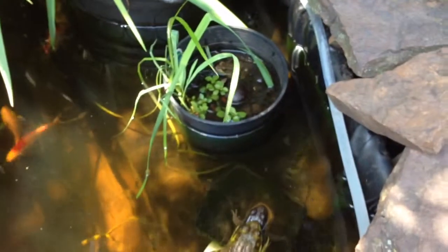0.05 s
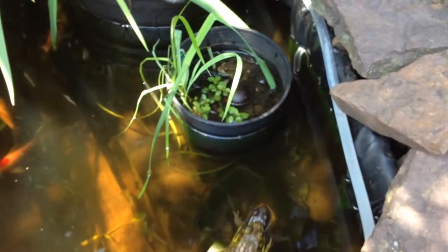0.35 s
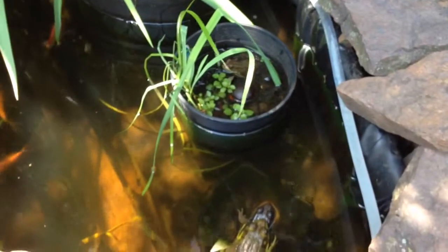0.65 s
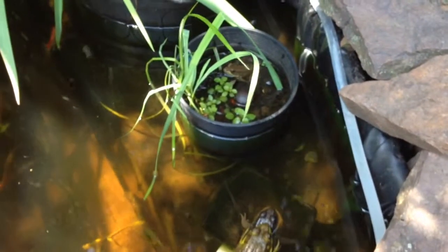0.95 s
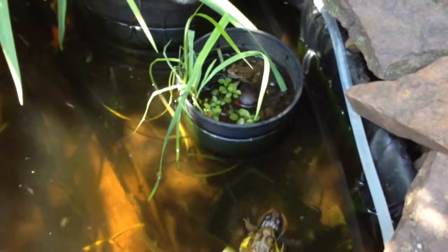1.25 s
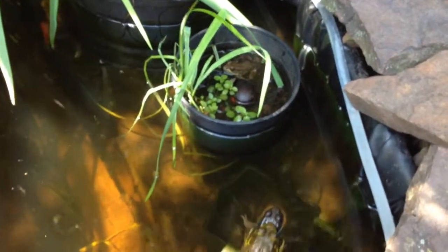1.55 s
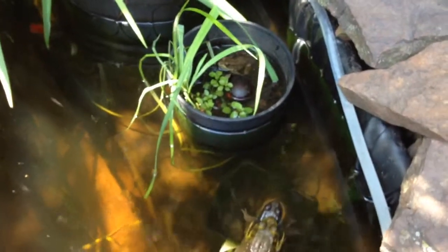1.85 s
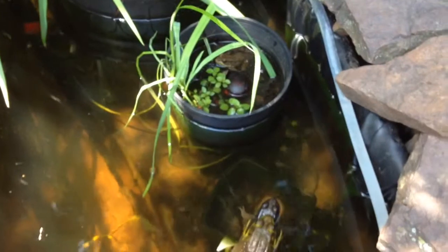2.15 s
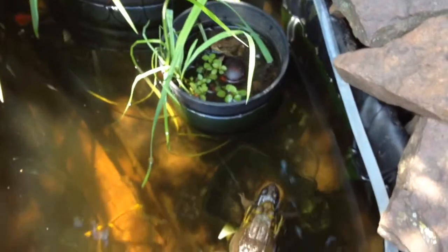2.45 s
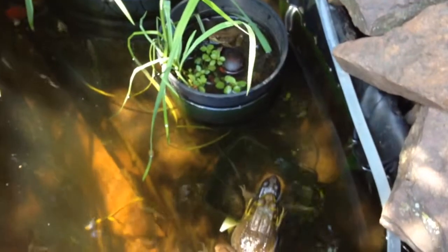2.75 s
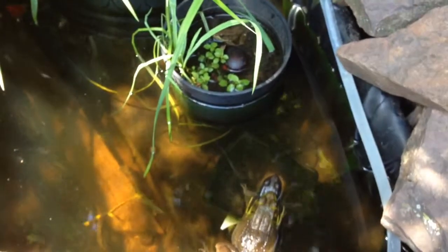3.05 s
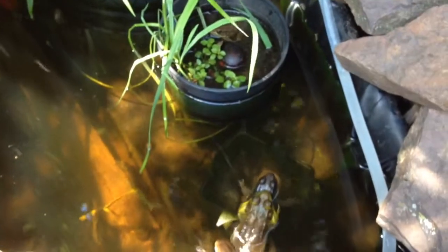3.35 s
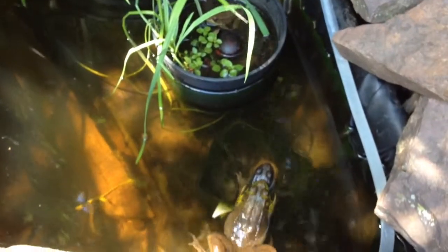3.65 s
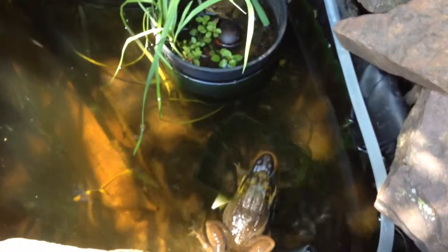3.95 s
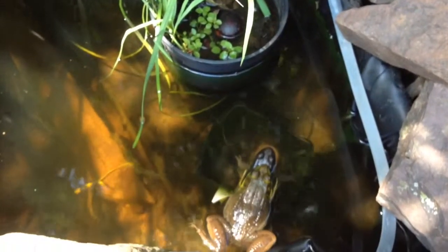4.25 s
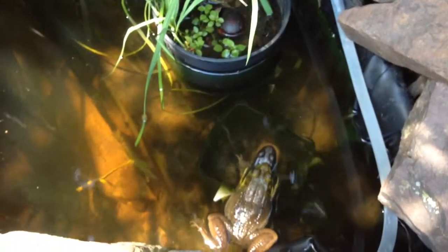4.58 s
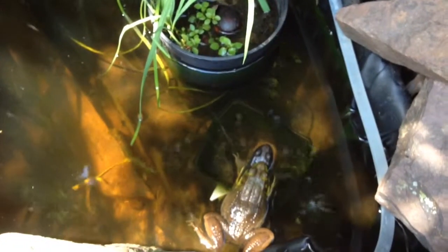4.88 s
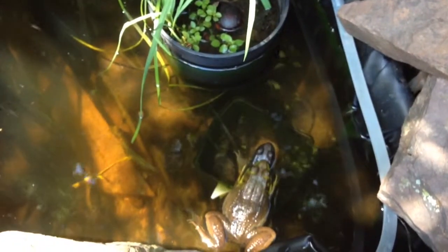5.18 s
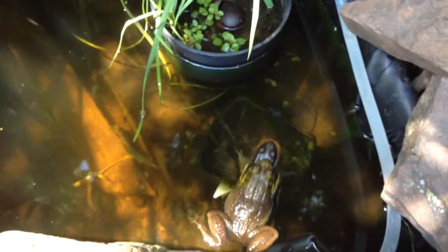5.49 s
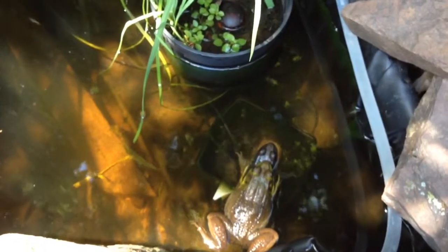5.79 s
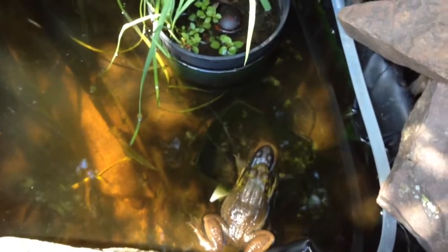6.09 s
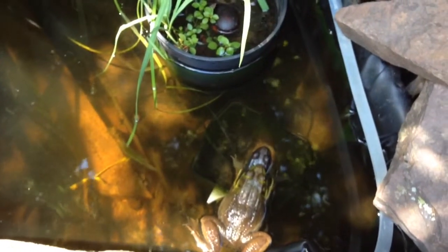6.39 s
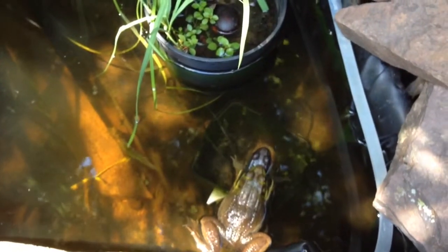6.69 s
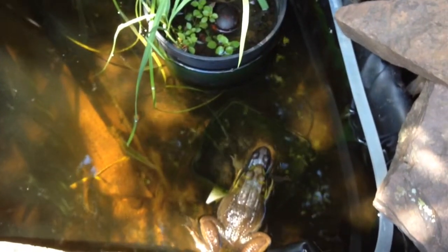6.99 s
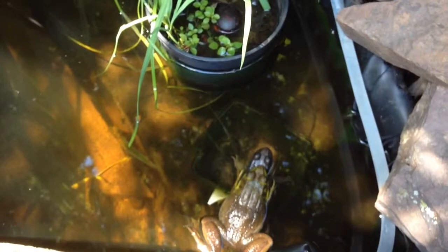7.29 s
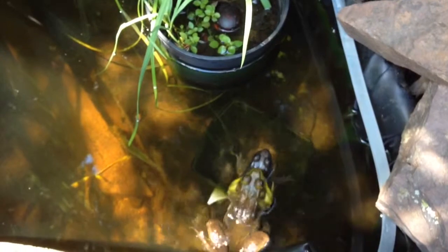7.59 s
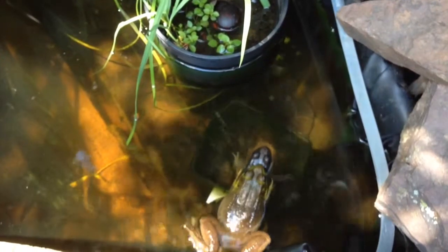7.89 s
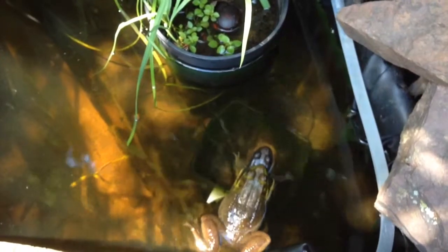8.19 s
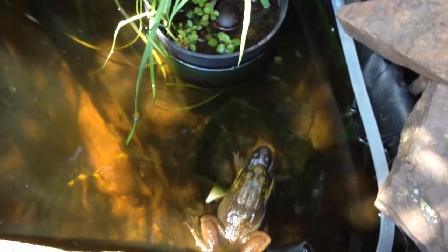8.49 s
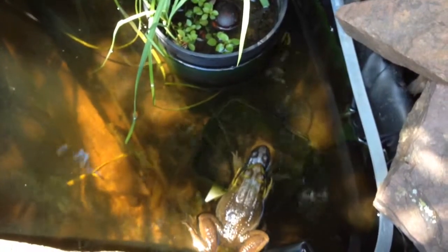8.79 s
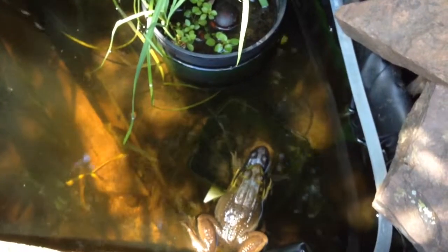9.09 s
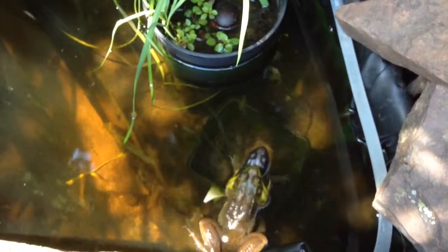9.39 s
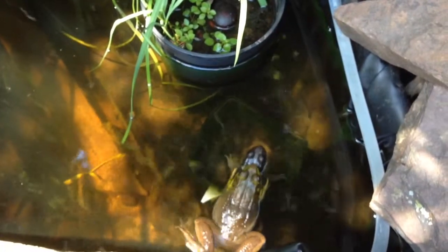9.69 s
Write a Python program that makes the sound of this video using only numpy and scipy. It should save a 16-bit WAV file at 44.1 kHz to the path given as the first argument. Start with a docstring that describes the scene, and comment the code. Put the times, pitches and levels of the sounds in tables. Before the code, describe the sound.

A frog gives five short, twanging croaks close by, over softly trickling pond water and a low pump hum.

```python
"""Green frog in a garden pond

A frog gives five twanging croaks, close by, in a small lined pond. Each opens with a fast flutter
of the voice box, then slows and dulls as the vocal sac (its throat pouch) rings on.
Water trickles in with small ringing bubbles and splash ticks. Behind it a pump hums with a slow
throb, and the garden air hisses and rumbles softly."""
import sys
import numpy as np
from scipy import signal
from scipy.fft import rfft, irfft, next_fast_len
from scipy.io import wavfile
from scipy.ndimage import map_coordinates

SR = 44100
rng = np.random.default_rng(int(sys.argv[2]) if len(sys.argv) > 2 else 0)


def wav_record(signal):
    """Record a signal, one row per channel, as 16-bit PCM in the file named by sys.argv[1]."""
    frames = np.transpose(np.atleast_2d(signal))
    bounded = np.clip(frames, -1, 1)
    # unit amplitude maps onto the largest positive 16-bit level
    quanta = np.round(bounded * 32767).astype(np.int16)
    wavfile.write(sys.argv[1], SR, quanta)


N = 438354

# tone colour of the garden air and of its low rumble (frequency [Hz], relative level [dB])
AIR_COLOUR = [(22, -22.5), (60, -10), (115, -1), (160, -3.5), (225, -1), (270, -8), (350, -6), (430, -16),
              (750, -19.5), (1500, -23.5), (4000, -24), (15000, -32)]
RUMBLE_COLOUR = [(20, -17.5), (45, -5), (62, 2.5), (82, 2), (130, -12), (300, -39), (600, -81)]
# how the pump's main hum swells and fades (time [s], level [dB])
PUMP_SWELL = [(0, -51.5), (0.4, -52.5), (1.15, -54), (1.85, -47), (2.9, -58.5), (3.5, -51), (3.9, -55.5),
              (4.7, -56), (5.05, -49), (5.4, -61.5), (6.55, -61), (7.05, -50.5), (7.35, -60.5),
              (7.65, -53.0), (8.0, -62.5), (8.95, -67.5), (9.3, -55.5), (9.9, -51.5)]
# the pump's faint higher tones (frequency [Hz], level [dB])
PUMP_TONES = [(236.9, -69.5), (360, -78.5), (592.8, -82.5), (600.2, -83), (1541, -89)]
# how long the pond's echo lasts (frequency [Hz], time to fade by 60 dB [s])
ECHO_FADE = [(300, 0.39), (1500, 0.1), (5000, 0.019), (12000, 0.013)]
# how strongly the water runs in (time [s], relative strength [dB])
INFLOW = [(0, -65.5), (1.2, -65.5), (2.3, -63.5), (3.1, -66.5), (4.3, -64.5), (6.1, -66), (7.1, -64),
          (8.3, -65.5), (9.9, -65.5)]
# the clearest bubbles (time [s], level [dB], pitch [Hz])
PLINKS = [(0.295, -44, 1194), (0.54, -51.5, 926), (0.699, -45, 3500), (0.875, -48, 1900),
          (1.434, -49, 3560), (1.711, -44.5, 1166), (1.803, -49.5, 1880), (2.185, -52.5, 1285),
          (2.294, -44.5, 3500), (2.322, -42, 1150), (2.543, -49.5, 3080), (2.602, -49, 2300),
          (2.631, -49, 2720), (2.844, -48.5, 1780), (3.3, -44.5, 1256), (3.637, -49.5, 1200),
          (3.739, -47, 2690), (4.663, -44, 1890), (4.716, -45, 3610), (6.166, -51.5, 934),
          (6.284, -52, 910), (6.526, -34, 1790), (6.981, -46.5, 2170), (7.085, -49, 1157),
          (7.38, -45.5, 1780), (8.083, -47.5, 2280), (8.623, -47.5, 1056), (8.813, -47.5, 3330),
          (8.872, -42, 2560), (9.153, -47, 1227), (9.742, -51, 1930)]
# the clearest drops hitting the water (time [s], level [dB], pitch of the bubble left behind [Hz])
DROPS = [(0.4599, -46, 5640), (0.7801, -38.5, 4510), (1.1418, -44, 6200), (1.6387, -46, 6560),
         (1.9849, -39.5, 7700), (2.0931, -42.5, 4540), (2.2483, -43, 10900), (2.385, -42.5, 8700),
         (3.8696, -40, 7040), (3.9175, -40, 8600), (4.1989, -39.5, 5500), (4.7142, -46.5, 5570),
         (5.4685, -33, 9100), (6.8658, -44.5, 6590), (6.9147, -34.5, 5760), (7.014, -40.5, 7560),
         (7.7608, -42, 9280), (8.8712, -42, 9900)]
# tone colour of a splash and of the frog's spit (frequency [Hz], relative level [dB])
SPLASH_COLOUR = [(700, -8.5), (2000, -4), (4000, 2), (8000, 3), (11000, -2), (15500, 0)]
SPIT_COLOUR = [(3000, -20.5), (7000, -11), (8300, 0.5), (11000, -4), (12500, -15), (15500, -12.5)]
# when spit flies as the sac swells (position in the flutter [0 to 1])
SPIT_MOMENTS = [0.45, 0.8]
# how the head and eardrums send out the call (frequency [Hz], gain [dB])
HEAD_COLOUR = [(100, -27.5), (160, -24), (220, 1), (400, -0.5), (600, -4), (850, -3.5), (1060, -8.5),
               (1330, -5.5), (1800, -10), (2100, -10), (3000, -14.5), (3900, -24), (4700, -24.5),
               (7000, -41)]
# ringing hollows in the head (frequency [Hz], width [Hz], boost [dB])
HEAD_HOLLOWS = [(605, 90, 6), (1340, 170, 7), (1780, 190, 8), (2480, 200, 6), (2830, 200, 5),
                (4600, 500, 4)]
# slack vocal cords close softly and lose the high notes first (frequency [Hz], cut [dB per dB of edge])
SLACK_CUT = [(480, 0), (700, .15), (880, .3), (1050, .9), (1350, 1.1), (1700, 1.7), (3000, 2.2),
             (4500, 3)]
# pressed cords push the middle range forward (frequency [Hz], lift [dB per dB of edge])
PRESSED_LIFT = [(350, 0), (620, .7), (1050, .45), (1700, 1.05), (3500, 0)]
# a sharper snap lifts only the upper treble (frequency [Hz], lift [dB per dB of bite])
BITE_LIFT = [(2000, 0), (3100, 1)]
# flutters that open a croak or push it again; "edge" is brightness, "bite" is upper treble
# (first pulse [s], last pulse [s], level [dB], edge [dB], bite [dB], sac note [Hz], spit level [dB])
FLUTTERS = [(1.1810, 1.1898, -13.5, 4, 3, 446, -41.5), (3.3526, 3.3624, -13.5, 3, -0.5, 414, -36.5),
            (5.114, 5.1282, -19.5, 7, -2.5, 394, -53.5), (5.1448, 5.16, -22, 8, 1.5, 640, -55.5),
            (7.4948, 7.5, -11, 5, 4, 443, -41.5), (7.515, 7.53, -17, -0.5, 1.5, 387, -39),
            (9.324, 9.3377, -14.5, 0, -1, 395, -38)]
# croaks: the voice catches, pushes hard, then goes slack
# (start [s], length [s], catch length [s], end of push [s after start], bite [dB],
#  pushed level [dB], slack level [dB], pushed pulse rate [Hz], slack pulse rate [Hz],
#  pushed edge [dB], slack edge [dB], pushed sac note [Hz], slack sac note [Hz])
CROAKS = [(1.198, 0.18, 0.00016, 0.026, -5.5, -18.5, -24.5, 140.1, 119.6, -2, -9.5, 300, 332),
          (3.371, 0.2, 0.0034, 0.036, -2, -16, -22.5, 149.3, 120.9, -1, -10, 330, 332),
          (5.134, 0.25, 0.024, 0.070, -7, -22, -28, 150.4, 119.2, 1, -9, 286, 254),
          (7.5078, 0.186, 0.0225, 0.061, -1, -14.5, -22.5, 154, 118.7, -1, -10, 339.5, 342),
          (9.343, 0.2, 0, 0.026, -3, -18, -27, 143.4, 115.2, -2.5, -9.5, 316, 332)]


def amp(db):
    """Turn decibels into a gain."""
    return 10 ** (np.asarray(db) / 20)


def along(points, hz):
    """Read a (frequency, value) table at hz, on a log frequency scale."""
    freqs, values = np.transpose(points)
    return np.interp(np.log(hz + 1), np.log(freqs), values)


def curve(rows):
    """Turn a (time, value) table into one value per sample."""
    return np.interp(np.arange(N) / SR, *np.transpose(rows))


def wobble(rate):
    """A smooth curve through `rate` random points a second."""
    return map_coordinates(rng.standard_normal(int(N * rate / SR) + 4), [np.arange(N) * rate / SR])


def filtered(x, response):
    """Scale each frequency in x by response(frequency)."""
    size = next_fast_len(N + SR // 2)
    return irfft(rfft(x, size) * response(np.fft.rfftfreq(size, 1 / SR)), size)[:N]


def unit(x):
    """Scale x to an average (rms) level of 1."""
    return x / np.sqrt(np.mean(x ** 2) + 1e-20)


def noise(colour):
    """Noise of level 1 with the given tone colour."""
    return unit(filtered(rng.standard_normal(N), lambda hz: amp(along(colour, hz))))


def add(track, s, sound):
    """Mix a sound into the track at s seconds."""
    part = track[max(round(s * SR), 0):][:len(sound)]
    part += sound[:len(part)]


def ringing(gain):
    """A click with this gain at each frequency, which starts at once and rings afterwards."""
    cepstrum = irfft(np.log(np.maximum(gain, 1e-6)))
    half = len(cepstrum) // 2
    cepstrum[1:half] *= 2
    cepstrum[half + 1:] = 0
    return irfft(np.exp(rfft(cepstrum)))


def air(hiss_db=-59, rumble_db=-59):
    """A smooth outdoor hiss and an uneven low rumble."""
    swells = amp(2.8 * wobble(11))
    hiss = amp(hiss_db + .5 * wobble(3)) * noise(AIR_COLOUR)
    return hiss + amp(rumble_db) * unit(swells * noise(RUMBLE_COLOUR))


def pump(hum_hz=96.9, upper_hz=110.6, upper_db=-60):
    """Two close low tones beat against each other and throb, under faint higher tones."""
    t = np.arange(N) / SR
    tone = lambda hz: np.sqrt(2) * np.sin(2 * np.pi * hz * t + .3 * wobble(2))
    faint_tones = sum(amp(db + 2 * wobble(2)) * tone(hz) for hz, db in PUMP_TONES)
    swell_db = curve(PUMP_SWELL)
    drift_db, shudder_db = 1.8 * wobble(3), 1.8 * wobble(16)
    # the upper tone follows most of the hum's swell
    upper = amp(upper_db + .79 * (swell_db - swell_db.mean()) + drift_db) * tone(upper_hz)
    hum = amp(swell_db + .5 + shudder_db) * tone(hum_hz)
    return hum + upper + faint_tones


def pond_echo(x, low_cut_hz=700):
    """The liner and stones scatter the higher sounds into a brief echo."""
    hz, t, spectrum = signal.stft(rng.standard_normal(SR // 4), SR, nperseg=128)
    fade = amp(-60 * t / along(ECHO_FADE, hz)[:, None])
    tail = signal.istft(spectrum * fade, SR, nperseg=128)[1]
    delayed_tail = np.pad(tail / np.linalg.norm(tail), (SR // 600, 0))
    echo = signal.fftconvolve(x, delayed_tail)[:N]
    return filtered(echo, lambda f: f ** 2 / (f ** 2 + low_cut_hz ** 2))


def splashes(hits, colour, fade_s, spray_db, spray_s):
    """A wet crack and a little spray at each (time, level); they fall 60 dB in fade_s and spray_s."""
    level, t = np.zeros(N), np.arange(SR // 20) / SR
    shape = amp(-60 * t / fade_s) + amp(spray_db - 60 * t / spray_s)
    for s, db in hits:
        add(level, s, amp(db) * shape)
    return level * noise(colour)


def bubble(hz, cycles, rise):
    """Trapped air rings, swells for some cycles and dies; its note rises as it nears the surface."""
    age = np.arange(int(10 * cycles * SR / hz)) / SR * hz / cycles  # 1 at the loudest point
    return np.sin(2 * np.pi * cycles * (age + rise * age ** 2 / 2)) * age * np.exp(1 - age)


def bubble_pairs(low_hz, high_hz, db, spread_db, cycles, count):
    """Bubbles of random size and pitch, each closely followed by a smaller, higher one."""
    out = np.zeros(N)
    for when, delay, pitch, size, life in rng.random((count, 5)):
        s = when * N / SR
        hz = low_hz * (high_hz / low_hz) ** pitch
        gain = amp(db + spread_db * size ** 3)
        add(out, s, gain * bubble(hz, cycles * (.5 + life), rise=.0058))
        add(out, s + .0033 * delay, gain * amp(-6.5) * bubble(hz * (1 + life), cycles / 2, rise=.012))
    return out


def trickle(surge=2.2):
    """Small bubbles and crackling droplets grow louder and softer with the inflow."""
    gulps = bubble_pairs(880, 1280, db=-63, spread_db=8, cycles=4, count=50)
    babble = bubble_pairs(1500, 3700, db=-66, spread_db=12, cycles=4, count=480)
    fizz = bubble_pairs(4500, 10500, db=-67, spread_db=16, cycles=4.5, count=420)
    droplets = [(when * N / SR, -61 + 11 * size ** 3) for when, size in rng.random((300, 2))]
    crackle = splashes(droplets, SPLASH_COLOUR, fade_s=.0027, spray_db=-6.5, spray_s=.038)
    flow_db = curve(INFLOW)
    return amp(surge * (flow_db - flow_db.mean())) * (gulps + babble + fizz + crackle)


def plinks():
    """A drop makes a tiny splash and traps two bubbles: a main one and a smaller, higher one."""
    out = np.zeros(N)
    for s, db, hz in PLINKS:
        life, ratio, lag = rng.random(3)
        add(out, s, amp(db - .5) * bubble(hz, cycles=2 + 2 * life, rise=.014))
        add(out, s + .003 * lag, amp(db - 9) * bubble(hz * (1.3 + ratio), cycles=3, rise=.014))
    hits = [(s, min(db, -46) - 6) for s, db, _ in PLINKS]
    return out + splashes(hits, SPLASH_COLOUR, fade_s=.0032, spray_db=-19, spray_s=.028)


def drop_ticks(gain_db=-5.5):
    """Drops hit the water with a sharp tick, and each leaves a tiny pinging bubble."""
    hits = [(s, db) for s, db, _ in DROPS]
    out = splashes(hits, SPLASH_COLOUR, fade_s=.002, spray_db=-9, spray_s=.03)
    for s, db, hz in DROPS:
        add(out, s, amp(db - 3) * bubble(hz, cycles=5, rise=.02))
    return amp(gain_db) * out


def spit():
    """Each flutter of the frog's voice box throws out a little wet spray."""
    spurts = [(first + share * (last - first), spit_db)
              for first, last, *_, spit_db in FLUTTERS for share in SPIT_MOMENTS]
    return splashes(spurts, SPIT_COLOUR, fade_s=.011, spray_db=-19, spray_s=.15)


def cord_snap(rate_hz, edge_db, bite_db, sac_hz, sac_width_hz, sac_db):
    """One snap of the vocal cords rings the sac and head; repeated at rate_hz, its level is near 1."""
    hz = np.fft.rfftfreq(2048, 1 / SR)
    peak = lambda centre, width, db: 1 + (amp(db) - 1) / np.hypot(1, 2 * (hz - centre) / width)
    sac = peak(sac_hz, sac_width_hz, sac_db)
    hollows = np.prod([peak(*hollow) for hollow in HEAD_HOLLOWS], axis=0)
    cords_db = edge_db * along(SLACK_CUT if edge_db < 0 else PRESSED_LIFT, hz)
    colour_db = along(HEAD_COLOUR, hz) + cords_db + bite_db * along(BITE_LIFT, hz)
    ring = ringing(sac * hollows * amp(colour_db))
    # the head holds the snap for a moment, so it swells instead of clicking
    lag = sum(2 * np.arctan2(hz * centre / 2.8, centre ** 2 - hz ** 2)
              for centre, *_ in HEAD_HOLLOWS[1:])
    ring = irfft(rfft(ring) * np.exp(-1j * lag))
    return ring * np.sqrt(SR / rate_hz / np.sum(ring ** 2))


def flutters(rate_hz=465, swell_db=11.5):
    """The voice box leaks one faint pulse, then bursts open in a few very quick ones that swell."""
    out = np.zeros(N)
    for first, last, db, edge_db, bite_db, sac_hz, _ in FLUTTERS:
        leak = cord_snap(rate_hz, 0, bite_db, sac_hz, sac_width_hz=84, sac_db=7)
        add(out, first - .0036, amp(db - 21.5) * leak)
        count = int(np.clip(round((last - first) * rate_hz) + 1, 2, 10))
        for progress, (slip, size) in zip(np.linspace(0, 1, count), rng.standard_normal((10, 2))):
            rise_db = swell_db * min(progress / .76 - 1, 0)
            snap = cord_snap(rate_hz, edge_db + rise_db / 3, bite_db, sac_hz, sac_width_hz=84, sac_db=11)
            add(out, first + progress * (last - first) + .00018 * slip, amp(db + rise_db + size) * snap)
    return out


def croaks(relax_s=.008, release_s=.0043, fade_db=31.5, sag_hz=32.6, dull_db=6.5):
    """Hard-driven cords beat unevenly and rebound, then settle into a clean, falling twang."""
    out = np.zeros(N)
    treble_only = signal.butter(2, 1000, 'high', fs=SR, output='sos')
    for start, length, catch_s, push_s, bite_db, *states in CROAKS:
        pushed, slack = np.reshape(states, (-1, 2)).T
        t = 0
        for slip, size, colour, late in rng.standard_normal((60, 4)):  # each snap varies by chance
            if t > length:
                break
            push = .5 - .5 * np.tanh((t - push_s) / (2 * relax_s))
            db, rate_hz, edge_db, sac_hz = slack + push * (pushed - slack)
            catch = np.clip((catch_s - t) / release_s, 0, 1)  # a catching voice: weak, strained, slower
            spent = t / length  # as the lungs empty, the call fades, slows, dulls and sinks
            db -= 8.5 * catch + fade_db * spent ** 2.72
            rate_hz -= 7 * catch + sag_hz * spent ** 3.6
            edge_db += 2.5 * catch - dull_db * spent
            sac_hz *= 1 - .09 * spent ** 3.6
            sac_db = 22 - np.clip(edge_db + 3, 0, 10)  # a strained voice fills the sac less
            rough = np.clip(1 + edge_db / 13, .04, 1)
            snap = cord_snap(rate_hz, edge_db + rough * colour, bite_db, sac_hz,
                             sac_width_hz=46, sac_db=sac_db)
            snap *= amp(db - .5 + rough * size)
            rebound = .45 * rough * signal.sosfilt(treble_only, snap)
            add(out, start + t, snap)
            add(out, start + t + .0012 * np.exp(late / 3), rebound)
            t += (1 + .025 * rough * slip) / rate_hz
    return out


def scene():
    """Frog and water echo in the pond, over the pump and the air, in one channel."""
    frog = croaks() + flutters() + spit()
    water = plinks() + trickle() + drop_ticks()
    echo = pond_echo(amp(-10) * frog + amp(-14) * water)
    return (frog + water + echo + pump() + air())[None]


def record(dry, top_hz=15500):
    """Cut away the very highest treble."""
    return np.array([filtered(x, lambda hz: hz < top_hz) for x in dry])


dry = scene()
out = record(dry)
wav_record(out)
```